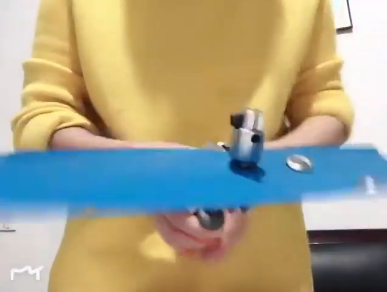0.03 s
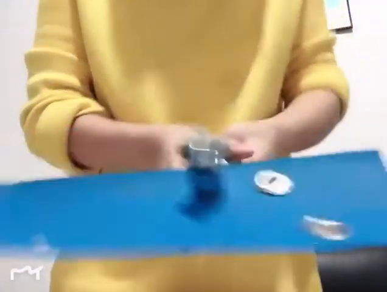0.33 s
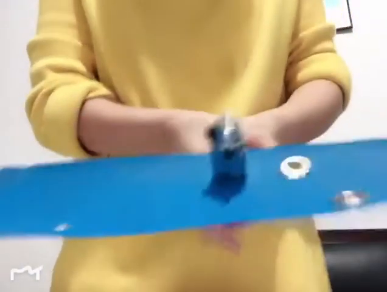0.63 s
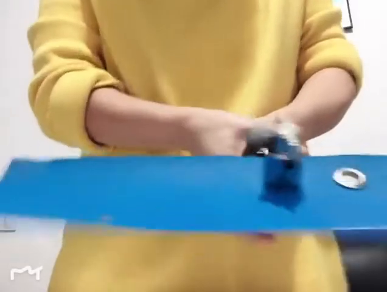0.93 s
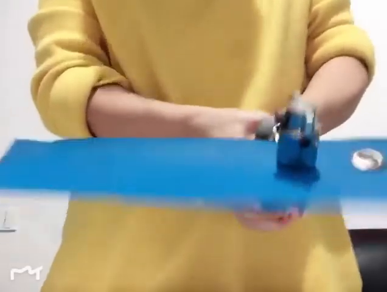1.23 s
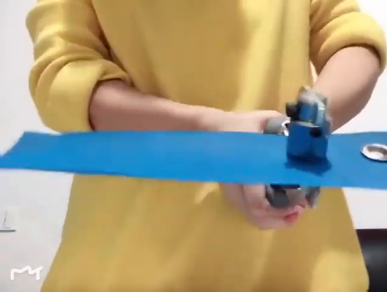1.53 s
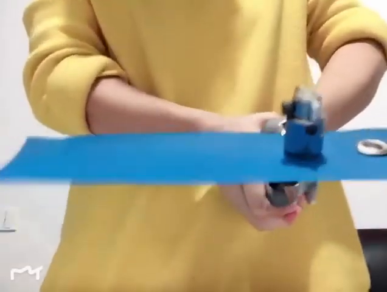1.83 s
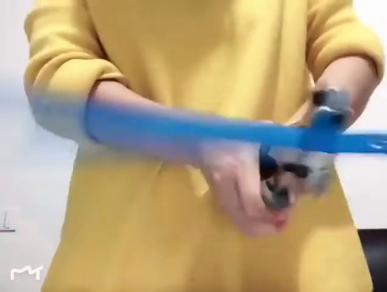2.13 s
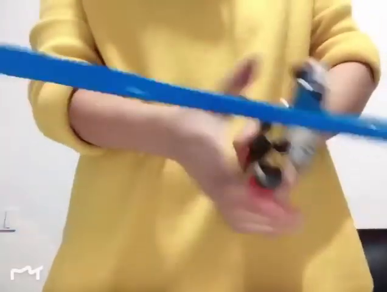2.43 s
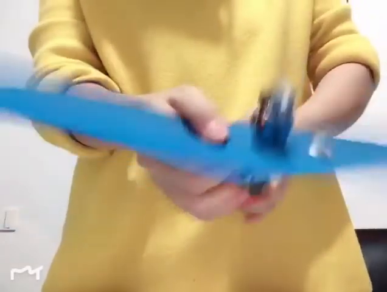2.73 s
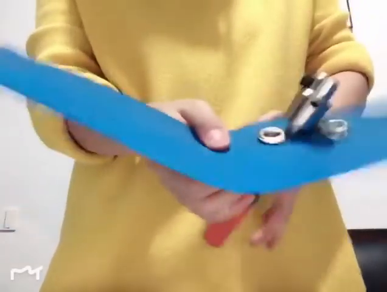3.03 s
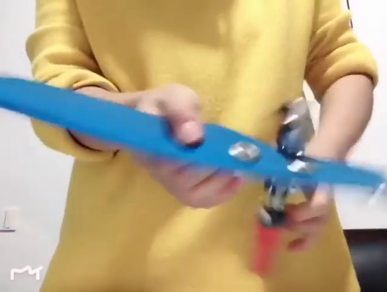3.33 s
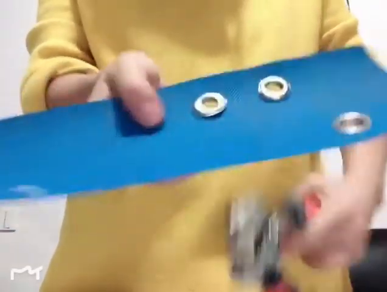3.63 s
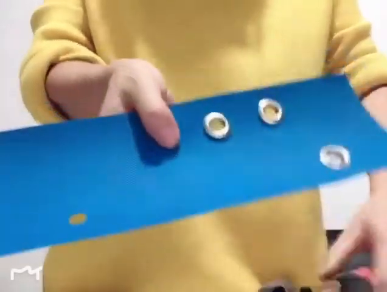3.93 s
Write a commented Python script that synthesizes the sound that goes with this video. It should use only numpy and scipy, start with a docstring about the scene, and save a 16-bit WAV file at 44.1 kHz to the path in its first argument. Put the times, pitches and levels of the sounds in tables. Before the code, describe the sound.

Hand pliers creak and click sharply as they press an eyelet into stiff plastic, then rattle and scrape free. The sheet buckles with two loud clusters of wobbling pops, close to the microphone in a quiet room.

```python
"""Faint scrapes over a low room hum, then sharp creaks: hand pliers press an eyelet into stiff plastic.
The loaded joint sticks and slips, ringing levers and jaws; it rattles as it lets go and the jaws
scrape free. The sheet then buckles in two loud clusters of wobbling pops, each pop a bending wave
echoing between the edges. The loudest overload the close microphone."""
import sys
import numpy as np
from scipy import signal
from scipy.fft import rfft, irfft
from scipy.io import wavfile
from scipy.ndimage import uniform_filter1d

SR = 44100
rng = np.random.default_rng(int(sys.argv[2]) if len(sys.argv) > 2 else 0)


def wav_out(sig):
    """Save sig, one row per channel (or a flat mono array), as 16-bit PCM at SR to the path in sys.argv[1]."""
    wavfile.write(sys.argv[1], SR, np.round(np.clip(np.atleast_2d(sig).T, -1, 1) * 32767).astype(np.int16))


N = 176400

# t/s, level/dB, jaw-to-lever ratio/dB
JOINT_SLIPS = [(0.808, -52, -13), (0.8265, -42, -16), (0.8525, -52, -6), (0.8833, -44, -12),
               (0.9028, -33, -10), (0.9175, -33.5, -8), (0.928, -40, -7), (0.9389, -37, -8),
               (0.9476, -43, -7), (0.9583, -39, -8), (0.971, -41.5, -10), (0.9823, -35.5, -16),
               (0.9934, -45, -7), (1.002, -37, -4), (1.0115, -40, -12), (1.0204, -40.5, -3),
               (1.027, -50, 8), (1.0357, -50, 4), (1.042, -53, -2), (1.0734, -51, 0), (1.086, -46, -1),
               (1.0987, -47.5, 3), (1.111, -44, -11), (1.13, -45, -5), (1.146, -50, -2), (1.1758, -41, -12),
               (1.2484, -42.5, -1), (1.27, -39, -5), (1.3324, -36, -1.5), (1.356, -39, -5.5),
               (1.4452, -33, -2.5), (1.5038, -39, -1.5), (1.5544, -33, -3), (1.6272, -34.5, 0.5),
               (1.8048, -31.5, 1), (1.842, -30.5, -1.5), (1.87, -32.5, 0.5), (1.8907, -38, 2),
               (2.1576, -27.5, 2), (2.374, -41, 5), (2.3868, -40.5, 1), (2.4603, -39.5, 3),
               (2.4942, -33, 6.5), (2.5021, -40, 8), (2.5171, -38.5, 8), (2.526, -35, 4), (2.5374, -35, 10),
               (2.5471, -34.5, 6), (2.564, -31.5, 8), (2.569, -41, 13.5), (2.573, -39.5, 6),
               (2.58, -34.5, 2), (2.591, -41.5, 5), (2.5974, -39.5, 2.5), (2.7575, -31, 4.5),
               (3.415, -67, 13.5)]
# t/s, mode tilt/(dB/octave)
SLIP_TILT = [(1.9, 0), (2.16, 2.5), (2.55, 0), (2.76, 7)]
# t/s, level/dB
CREEP_LEVEL = [(.76, -60), (.81, -46), (.85, -47), (.89, -51), (.93, -45.5), (1.03, -44.5), (1.08, -56),
               (1.2, -63), (1.5, -86)]
def pliers(creep_per_s=200, lead_s=0.00052, lead_db=-10, highpass_hz=1900):
    """Stick-slip in the joint: each slip catches, then snaps; tiny slips rasp as the grip tightens."""
    slips, rasp, t = np.zeros(N), np.zeros(N), np.arange(2048) / SR
    for s, db, jaw_db in JOINT_SLIPS:
        click = snap(jaw_db, tilt_db=np.interp(s, *np.transpose(SLIP_TILT)))
        add(slips, s, amp(db) * click)
        add(slips, s - lead_s, amp(db + lead_db) * click * np.exp(-t / lead_s))
    creep_count = np.cumsum(creep_per_s * np.exp(0.42 * drift(90))) / SR
    for s in np.flatnonzero(np.diff(np.floor(creep_count))) / SR:
        if CREEP_LEVEL[0][0] < s < CREEP_LEVEL[-1][0]:
            add(rasp, s, snap(jaw_db=-5, tilt_db=0))
    highpass = signal.butter(6, highpass_hz, "high", fs=SR, output="sos")
    return signal.sosfilt(highpass, slips + amp(curve(CREEP_LEVEL)) * rasp)


# f/Hz, level/dB, t60/s
LEVER_RING = [(2344, 6, 0.014), (3070, -10, .008), (3475, -21, 0.1), (4430, 1.5, 0.014), (5410, 3.5, 0.011),
              (7300, -13.5, 0.023), (8800, -15.5, 0.014), (9800, -19, 0.013)]
JAW_RING = [(3874, 2, 0.011), (4150, -5.5, 0.0081)]
# f/Hz, level/dB
GRIT_SPECTRUM = [(1600, 13), (2900, 8.5), (4400, 8), (5700, -24), (6500, -9), (11000, -16)]
def snap(jaw_db, tilt_db, contact_s=0.0001, grit_s=0.0027, grit_db=-1):
    """One slip: a gritty contact rings the levers and the jaws."""
    t = np.arange(2048) / SR
    attack = 1 - np.exp(-t / contact_s)
    grit = burst(noise(GRIT_SPECTRUM, len(t)) * np.exp(-t / grit_s))
    lever, jaw = (burst(attack * ring(modes, len(t), detune=0.016, uneven_db=3, tilt_db=tilt_db))
                  for modes in (LEVER_RING, JAW_RING))
    return lever + amp(jaw_db) * jaw + amp(grit_db) * grit


# t/s, level/dB, cutoff/Hz, delay at 1 kHz/s, echo level/dB
BUCKLES = [(3.5884, -19.5, 480, 0.0037, 1), (3.5975, -7.5, 151, 0.0034, -12),
           (3.6353, -2.5, 506, .0044, -4), (3.647, -3.5, 213, 0.00348, -16),
           (3.7050, -15, 220, 0.00298, -13), (3.7400, -27.5, 440, 0.00406, 8),
           (3.7968, -11, 262, 0.00355, -13), (3.8099, -11.5, 143, 0.0022, -21),
           (3.9246, -1, 1145, .0037, -3), (3.9543, -12, 402, 0.00294, -22),
           (3.9715, -15.5, 790, 0.00308, -11)]
# per round trip: level/dB, cutoff ratio
EDGE_ECHOES = [(0, 0.26), (-2.5, 0.36), (-5.5, 0.51), (-12.5, 0.45)]
# f/Hz, level/dB, t60/s
SHEET_RING = [(100, 2, 0.072), (130, 1.5, 0.14), (194.4, -1, 0.16), (309.5, 3, 0.46), (379, 3, 0.092),
              (492, -7, 0.34), (549.5, -4, 0.26), (601, 3.5, 0.1), (677.5, 2, 0.14), (768, 0, 0.11)]
def sheet(round_trip_s=0.0105, wave_db=38.5, push_hz=39.8, push_s=0.024, push_db=-25.5, wobble_db=-56):
    """Each buckle sends out a chirp, duller edge echoes and a push of air, and sets the sheet wobbling."""
    pops, t = np.zeros(N), np.arange(8192) / SR
    push = np.sin(2 * np.pi * push_hz * t) * np.exp(-t / push_s)
    for s, db, cutoff_hz, delay_s, echo_db in BUCKLES:
        add(pops, s, amp(wave_db + db) * bending_wave(cutoff_hz, delay_s))
        add(pops, s + round_trip_s, amp(push_db + db) * push)
        for trip, (trip_db, cutoff_ratio) in enumerate(EDGE_ECHOES, 1):
            echo = bending_wave(cutoff_hz * cutoff_ratio, delay_s * 1.083)
            add(pops, s + trip * round_trip_s, amp(wave_db + db + echo_db + trip_db) * echo)
    wobble = signal.oaconvolve(pops, ring(SHEET_RING, size=16384))[:N]
    return pops + amp(wobble_db) * wobble


def bending_wave(cutoff_hz, delay_s, highpass_hz=112, lowpass_order=3.46):
    """A snap dispersed by the sheet: treble travels fastest, so it arrives as a falling chirp."""
    hz = np.fft.rfftfreq(8192, 1 / SR) + 1e-3
    highpass = signal.freqs(*signal.butter(3, highpass_hz, "high", analog=True), hz)[1]
    lowpass = 1 / np.sqrt(1 + (hz / cutoff_hz) ** (2 * lowpass_order))
    tilt = 1 / np.sqrt(1 + hz / 300)
    lag_cycles = 2 * delay_s * np.sqrt(1000 * hz)
    return irfft(highpass * lowpass * tilt * np.exp(-2j * np.pi * lag_cycles))[:4096]


# t/s, decay/s, low-band level/dB, mid-band level/dB, high-band level/dB
JAW_SCRAPES = [(0.255, 0.036, -62, -53, -68), (0.295, 0.045, -66, -50.5, -64.5),
               (0.533, 0.056, -59, -52, -55), (0.6521, 0.0036, -34.5, -41.5, -73),
               (0.6932, 0.0024, -52, -49, -61), (0.722, 0.0025, -57, -43.5, -69),
               (0.7613, 0.0022, -32, -35.5, -70), (0.773, 0.0032, -63, -50, -65),
               (1.2382, 0.003, -36.5, -45.5, -70), (1.921, 0.0013, -32, -64, -73),
               (2.0027, 0.02, -35, -43.5, -66), (2.865, 0.0062, -39.5, -36.5, -59),
               (2.8743, 0.0049, -31, -32.5, -42.5), (2.8916, 0.0068, -32.5, -36, -37.5),
               (2.905, 0.047, -33, -37.5, -46), (3.094, 0.0069, -31.5, -63, -52),
               (3.1127, 0.0022, -37.5, -42, -66), (3.12, 0.011, -61, -70, -56),
               (3.188, 0.0024, -41, -53.5, -71), (3.3281, 0.0055, -36, -55, -81),
               (3.5947, 0.003, -48, -30, -40), (3.633, 0.0023, -32, -44, -70),
               (3.6413, 0.016, -25.5, -31.5, -39.5), (3.9283, 0.00079, -14, -25.5, -26.5),
               (3.947, 0.011, -36, -56, -40)]
# low, mid, high band: f/Hz, level/dB
SCRAPE_BANDS = [
    [(300, 3.5), (700, -6), (1100, 2.5), (1400, -12.5), (1800, -3), (3000, -34)],
    [(1400, -5), (2200, -18), (3000, 6.5), (3450, 3.5), (3950, 4), (4700, 0.5), (6200, 0),
     (8500, -13), (12000, -20)],
    [(5000, -33), (7500, 13.5), (9800, 13), (11000, 20), (12500, -18)]]
def scrapes(grain_db=3):
    """Jaws and eyelet knock and scrape on the plastic in short, grainy noise bursts."""
    out, t = np.zeros(N), np.arange(8192) / SR
    for s, decay_s, *levels_db in JAW_SCRAPES:
        grain = unit_rms(uniform_filter1d(rng.standard_normal(len(t)), size=40))
        envelope = np.exp(-t / decay_s) * amp(grain_db * grain)
        for band, db in zip(SCRAPE_BANDS, levels_db):
            add(out, s, amp(db) * burst(envelope * noise(band, len(t))))
    return out


# t/s, level/dB
SQUEAK_LEVEL = [(3.23, -84), (3.28, -75), (3.42, -66), (3.52, -80), (3.58, -91)]
def squeak(pitch_hz=2580, flutter_db=3):
    """The jaws slide off with a faint, unsteady tone."""
    envelope = amp(curve(SQUEAK_LEVEL) + flutter_db * drift(28))
    return envelope * np.sin(2 * np.pi * pitch_hz * np.arange(N) / SR + drift(40))


# f/Hz, t60/s
ROOM_DECAY = [(100, 0.59), (400, 0.76), (1200, 0.58), (4000, 0.38), (11000, 0.49)]
def room(x, wet_db, build_s, lowpass_hz):
    """Adds a duller diffuse tail that builds up, then dies band by band."""
    hz, t, spectra = signal.stft(rng.standard_normal(SR // 2), SR, nperseg=256)
    build = 1 - np.exp(-(t / build_s) ** 2)
    decay = np.exp(-np.log(1000) * t / log_interp(ROOM_DECAY, hz)[:, None])
    tail = signal.istft(spectra * build * decay, SR, nperseg=256)[1]
    tail = signal.lfilter(*signal.butter(1, lowpass_hz, fs=SR), tail / np.linalg.norm(tail))
    return x + amp(wet_db) * signal.oaconvolve(x, tail)[:N]


# t/s, relative level/dB
DRONE_LEVEL = [(0, -74), (.45, -57.5), (.65, -44), (.85, -58), (1.05, -47.5), (1.35, -64), (1.6, -49.5),
               (1.85, -50), (2.1, -45.5), (2.6, -45), (2.8, -51), (3.05, -46), (3.55, -50.5)]
# f/Hz, level/dB
HUM_LINES = [(107.7, -62.5), (139, -63.5), (280, -69)]
AIR_SPECTRUM = [(15, -45), (25, -5.5), (68, 0.5), (106, -14.5), (141, -1), (165, -16.5), (192, -8.5),
                (306, -12.5), (665, -18), (930, -19), (1140, -22), (2610, -31.5), (2820, -33), (3850, -39),
                (12000, -51.5), (15600, -86), (22000, -120)]
def background(drone_hz=69.5, drone_db=-2, waver=0.46, wander_rad=0.91, air_db=-50.5):
    """Steady room air and a wavering hum whose lowest line swells and fades."""
    hum, t = np.zeros(N), np.arange(N) / SR
    for hz, db in [(drone_hz, curve(DRONE_LEVEL) + drone_db)] + HUM_LINES:
        envelope = np.sqrt(2) * amp(db) * (1 + waver * drift(1.9))
        hum += envelope * np.sin(2 * np.pi * hz * t + wander_rad * drift(2.9))
    return hum + amp(air_db) * noise(AIR_SPECTRUM, N)


def ring(modes, size, detune=0, uneven_db=0, tilt_db=0):
    """Decaying modes of a struck object, with optional scatter per blow and tilt per octave."""
    out, t = np.zeros(size), np.arange(size) / SR
    for hz, db, t60_s in modes:
        level_draw, pitch_draw = rng.standard_normal(2)
        gain = amp(db + uneven_db * level_draw + tilt_db * np.log2(hz / modes[0][0]))
        decay = np.exp(-np.log(1000) * t / t60_s)
        out += gain * decay * np.sin(2 * np.pi * hz * (1 + detune * pitch_draw) * t)
    return out


def noise(spectrum, size):
    """Shaped noise, rms 1."""
    gain = amp(log_interp(spectrum, np.fft.rfftfreq(size, 1 / SR)))
    return unit_rms(irfft(rfft(rng.standard_normal(size)) * gain, size))


def drift(rate_hz):
    """Slow random wander, rms 1."""
    lowpass = np.exp(-(np.fft.rfftfreq(N, 1 / SR) / rate_hz) ** 2)
    return unit_rms(irfft(rfft(rng.standard_normal(N)) * lowpass, N))


def amp(db):
    """Decibels to gain."""
    return 10 ** (np.asarray(db) / 20)


def unit_rms(x):
    """Scales to rms 1."""
    return x / np.sqrt(np.mean(x ** 2) + 1e-20)


def burst(x):
    """Scales to the energy of 1 ms of a unit sine."""
    return x / np.sqrt(np.sum(x ** 2) * 2000 / SR + 1e-20)


def log_interp(points, hz):
    """Interpolates on a log-frequency axis."""
    f, value = np.transpose(points)
    return np.interp(np.log(hz + 1), np.log(f + 1), value)


def curve(points):
    """Breakpoints to one value per sample."""
    return np.interp(np.arange(N) / SR, *np.transpose(points))


def add(mix, start_s, sound):
    """Mixes a sound in at start_s."""
    part = mix[max(round(start_s * SR), 0):][:len(sound)]
    part += sound[:len(part)]


def scene():
    """Pliers, scrapes and sheet in a quiet room, mono."""
    steel = room(pliers(), wet_db=-10, build_s=0.016, lowpass_hz=9000)
    rubbing = room(scrapes() + squeak(), wet_db=-7.5, build_s=0.0085, lowpass_hz=9000)
    plastic = room(sheet(), wet_db=-10.5, build_s=0.016, lowpass_hz=1500)
    return (steel + rubbing + plastic + background())[None]


def record(dry, ceiling=0.74, lowpass_hz=11950):
    """The overloaded microphone rounds off the peaks; a lowpass limits the band."""
    limited = dry / (1 + (dry / ceiling) ** 4) ** (1 / 4)
    return signal.filtfilt(signal.firwin(127, lowpass_hz, fs=SR), 1, limited)


dry = scene()
out = record(dry)
wav_out(out)
```